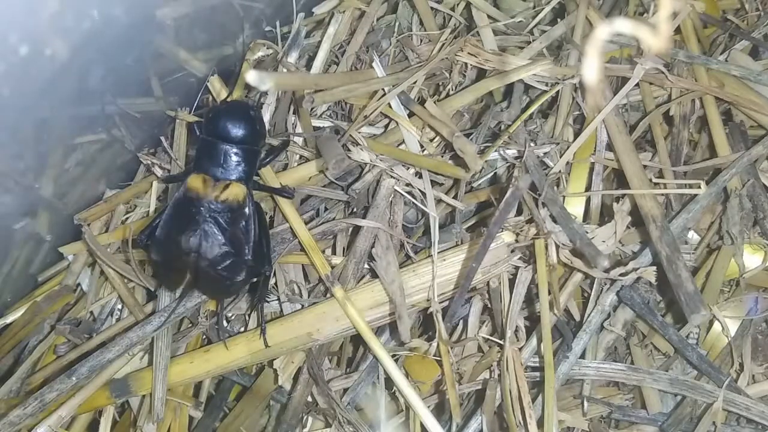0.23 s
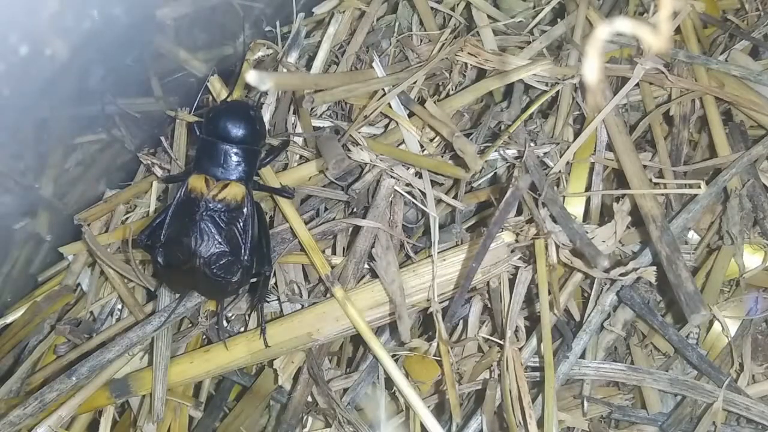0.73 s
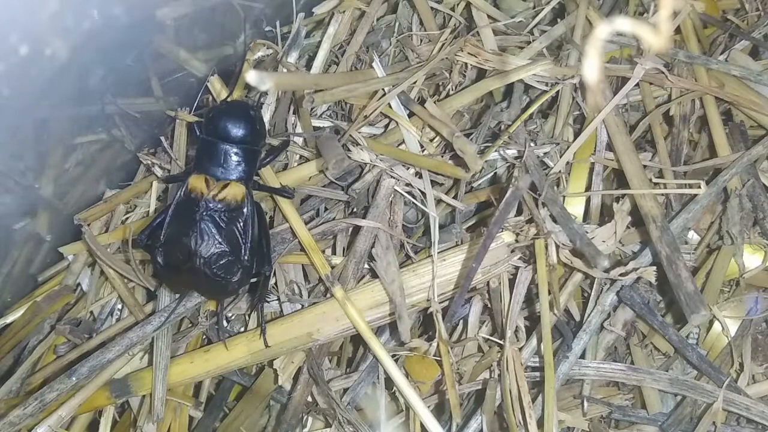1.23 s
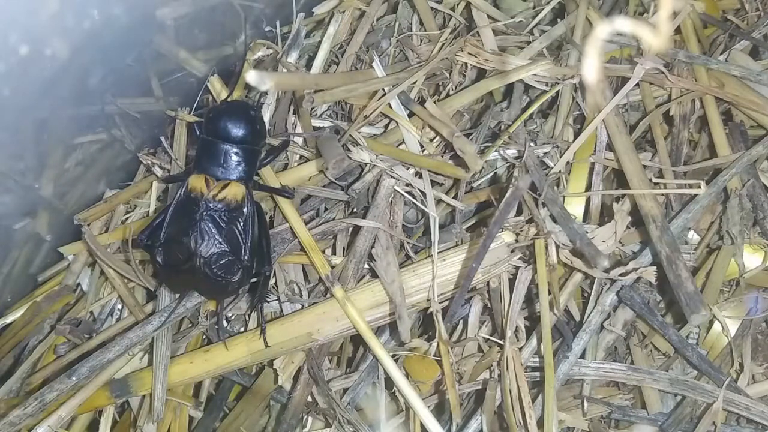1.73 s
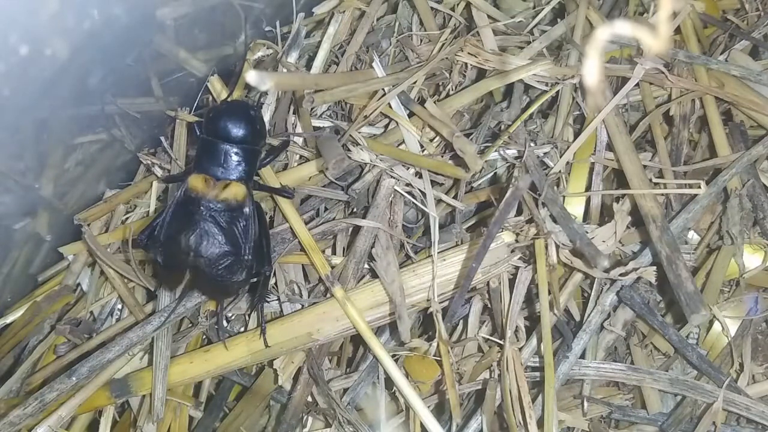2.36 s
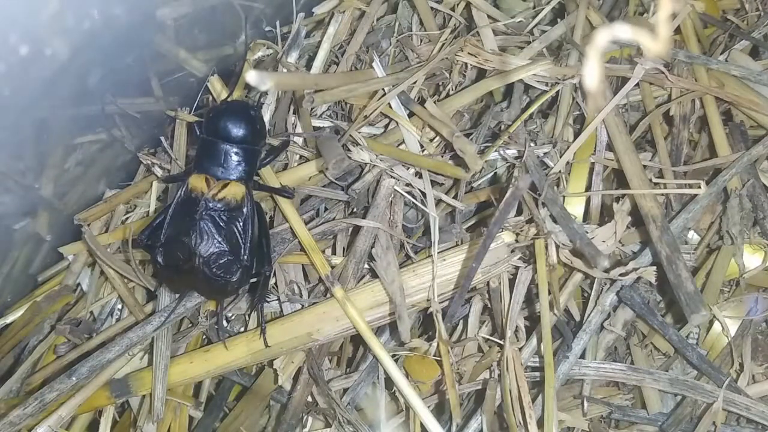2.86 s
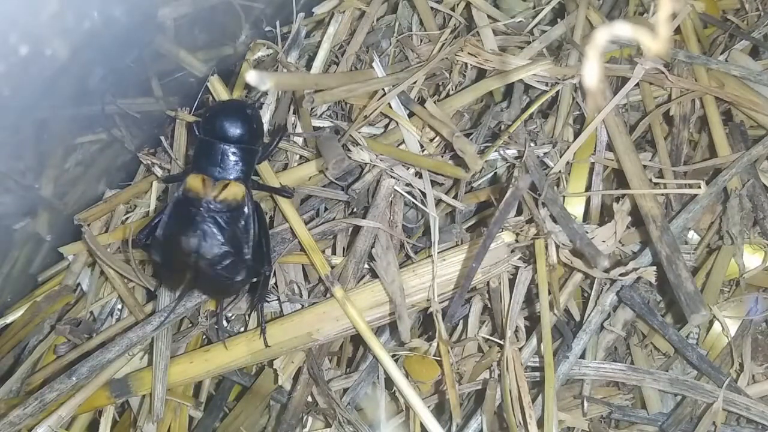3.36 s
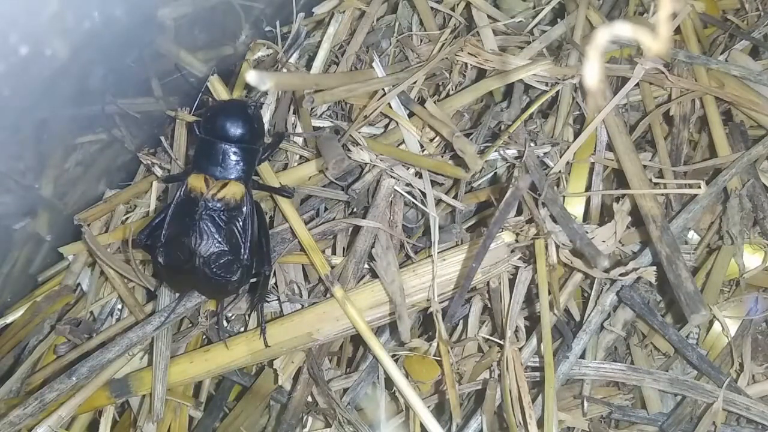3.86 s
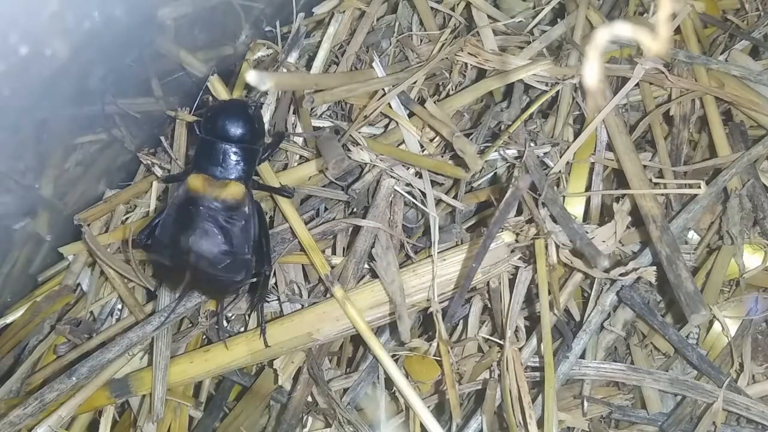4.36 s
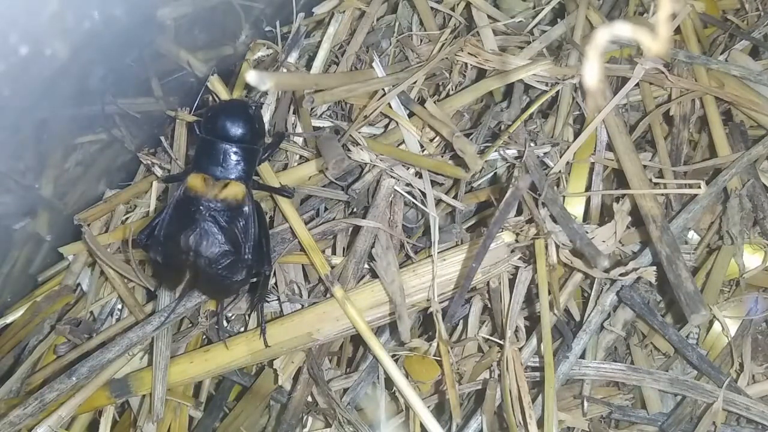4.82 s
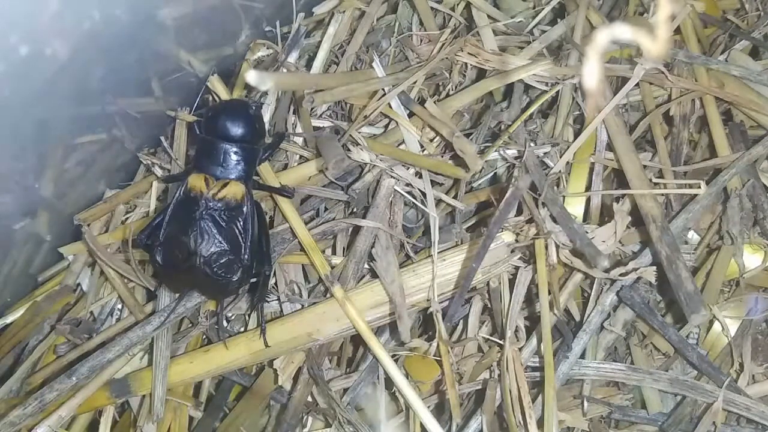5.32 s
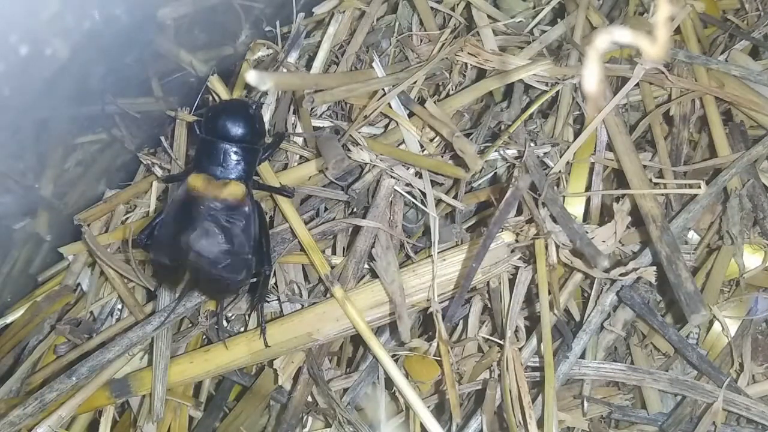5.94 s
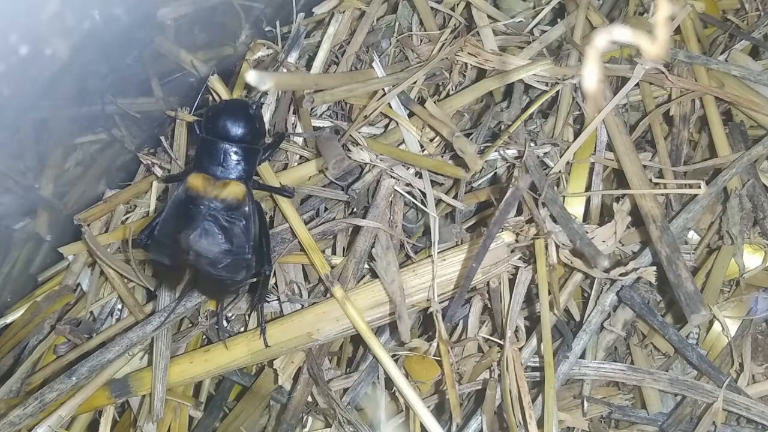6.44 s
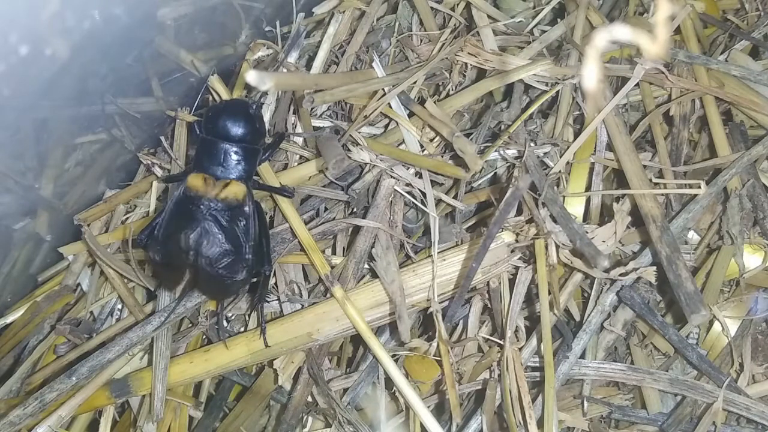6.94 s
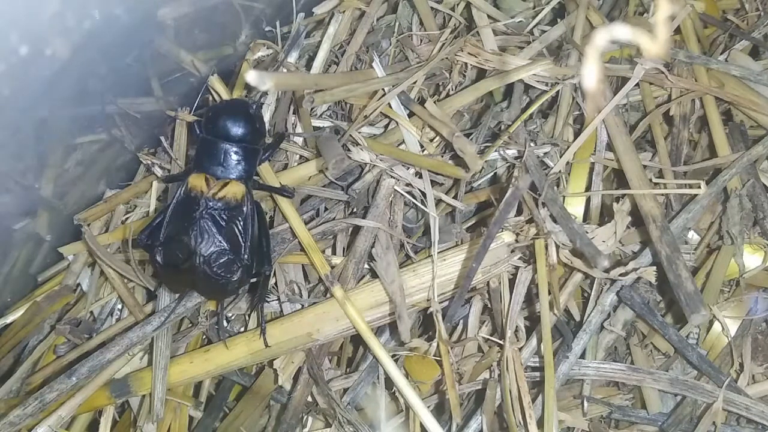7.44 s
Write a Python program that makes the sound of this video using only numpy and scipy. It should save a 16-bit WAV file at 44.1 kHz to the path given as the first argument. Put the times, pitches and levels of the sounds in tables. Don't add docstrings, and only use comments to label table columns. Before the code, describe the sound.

Shrill stridulation from one cricket, about four chirps a second, starting at once and continuing to the end. Faint scrapes precede bright pulses that swell, then sag slightly in pitch. After a weaker, less regular patch near the middle, the song becomes strong and even. A close overloaded microphone adds gritty edge on the right, with short tub reflections on the left and quiet gated pauses.

```python
import sys
import numpy as np
from scipy import signal
from scipy.fft import rfft, irfft, next_fast_len
from scipy.io import wavfile
from scipy.ndimage import uniform_filter1d

SR = 44100
rng = np.random.default_rng(int(sys.argv[2]) if len(sys.argv) > 2 else 0)


def ratio_of_db(decibels):
    return 10 ** (np.asarray(decibels, float) / 20)


def file_out(sig):
    cols = np.atleast_2d(sig).T
    lim = np.clip(cols, -1, 1)
    pcm = np.round(lim * 32767).astype(np.int16)
    wavfile.write(sys.argv[1], SR, pcm)


N = 338688
t = np.arange(N) / SR
SHORT_MS = 13.5


def shaped(x, gain):
    size = next_fast_len(N + SR // 4)
    hz = np.maximum(np.arange(size // 2 + 1) * SR / size, 1)
    return irfft(rfft(x, size) * gain(hz), size)[..., :N]


def spectrum(points):
    hz, db = np.transpose(points)
    return lambda f: ratio_of_db(np.interp(np.log(f), np.log(hz), db))


def resonances(modes):
    return lambda f: sum(ratio_of_db(db) / (1 + 1j * (f / hz - hz / f) * hz / w) for hz, w, db in modes)


def lag(x, s):
    a = np.exp(-1 / (max(s, 1e-5) * SR))
    return signal.lfilter([1 - a], [1, -a], x)


def wobble(rate):
    x = shaped(rng.standard_normal(N), lambda f: np.exp(-(f / rate) ** 2))
    return x / x.std()


def bursts(table, attack):
    env, place = np.zeros(N), np.zeros(N)
    for s, ms, db in table:
        i = slice(int(s * SR), min(int((s + ms / 1e3) * SR), N))
        place[i] = np.clip((t[i] - s) * 1e3 / ms, 0, 1)
        env[i] += ratio_of_db(db) * np.sin(np.pi * place[i] ** attack) ** 2
    return env, place


# frequency in Hz, level in dB per Hz.
AIR_SPECTRUM = [(18, -30.5), (35, -12), (112, 1), (400, -1), (600, -1.5), (1800, -9), (2600, -26),
                (4400, -60)]


def air():
    x = shaped(rng.standard_normal((2, N)), spectrum(AIR_SPECTRUM))
    return x / x.std() * ratio_of_db(np.array([[-76], [-72]]))


# start in seconds, length in ms, level in dB.
STRAY_STROKES = [
    (2.2286, 3.6, -27.5),
    (2.726, 8, -35),
    (2.7576, 6.6, -23),
    (3.238, 6, -17),
    (3.4361, 7.7, -51),
    (3.4533, 16, -31),
]
# lead in ms, length in ms, level in dB.
FULL_WARMUPS = [
    (41.28, 3.6, -31.5),
    (22.1, 8.5, -25.5),
]
# lead in ms, length in ms, level in dB.
SHORT_WARMUP_STROKE = (18.6, 7.5, -33.5)


def warmups():
    strokes_ahead = []
    for s, first_ms, *_ in FIRST_STROKES:
        leads = FULL_WARMUPS if first_ms > SHORT_MS else [SHORT_WARMUP_STROKE]
        for lead, ms, db in leads:
            strokes_ahead.append((s - lead / 1e3, ms, db + 1.5 * rng.standard_normal()))
    return STRAY_STROKES + strokes_ahead


def catches():
    lead_ms, length_ms = 3.43, 5.2
    loud = FIRST_STROKES + MIDDLE_STROKES + LAST_STROKES
    return [(s - lead_ms / 1e3, length_ms, catch_db) for s, _, _, catch_db in loud]


# frequency in Hz, width in Hz, level in dB.
WING_MODES = [
    (4400, 550, -22.5),
    (5220, 713, 4),
    (7000, 130, -5),
    (8800, 4500, -15),
    (13800, 6500, -17.5),
]


def scrapes(size):
    teeth = rng.standard_normal(N) * (rng.random(N) < .15)
    catch, _ = bursts(catches(), .9)
    tick, place = bursts(warmups(), 1.0)
    flutter_db = 4 * wobble(120)
    rub = lag(np.tanh(3 * size), 0.00033) * ratio_of_db(-11.5 + flutter_db)
    drive = catch * ratio_of_db(23.0) + tick * ratio_of_db(9.0) + rub
    ragged = shaped(teeth * drive, resonances(WING_MODES))
    ragged = shaped(ragged, lambda f: (.02 + 1 / (1 + (3800 / f) ** 14)) / (1 + (f / 9000) ** 3))
    glide_hz = 4800 - 800 * place + 70 * wobble(350)
    glide = np.sin(2 * np.pi * np.cumsum(glide_hz) / SR)
    return ragged + ratio_of_db(0.5) * tick * glide


# start in seconds, length in ms, near port level in dB over
# full scale, scraper catch level in dB.
FIRST_STROKES = [(0.0404, 11.1, -12.5, -25), (0.361, 4.6, -12, -38), (0.6176, 8.9, -9.5, -41),
                 (0.9558, 23.8, 0.5, -56), (1.1458, 12.9, -7.5, -30), (1.4689, 18.4, 0.5, -27.5),
                 (1.6913, 11.5, -13, -43), (1.9905, 19.8, 0.81, -57), (2.218, 6.4, -8, -55),
                 (2.521, 22.6, 0.95, -85.5), (2.7726, 15, 2.29, -26.5), (3.1559, 19.9, -6.5, -36.5),
                 (3.4721, 8.9, -9.5, -46), (3.794, 18.1, -5, -26.5), (4.2591, 16.5, -8.5, -23),
                 (4.4774, 21.3, -5, -27), (4.7577, 20.5, 0.81, -45), (4.9882, 23, 2.5, -29.5),
                 (5.2574, 21.3, 1.22, -29.5), (5.5041, 21.7, 1.6, -29.5), (5.7578, 24, 2.5, -35),
                 (6.0273, 24.5, 2.5, -43.5), (6.3048, 22.5, 2.5, -43.5), (6.5456, 21.5, 2.5, -25),
                 (6.8167, 24, 2.5, -39.5), (7.086, 23.6, 2.5, -45), (7.3497, 18, 3, -19),
                 (7.628, 20.4, 2.5, -34)]
# start in seconds, length in ms, near port level in dB
# over full scale, scraper catch level in dB.
MIDDLE_STROKES = [
    (0.0685, 21.5, 0.48, -31.5),
    (0.3811, 21, 0.5, -52),
    (0.643, 20.7, 0.5, -32),
    (1.1758, 16.7, 0.5, -26.5),
    (1.7177, 23.5, 0.5, -38),
    (2.242, 17.2, 0.5, -26),
    (2.8048, 18, 2.5, -22.5),
    (3.494, 20.4, -1, -28),
    (3.8255, 20.7, 0.92, -24.5),
]
# start in seconds, length in ms, near port level in dB over full scale,
# scraper catch level in dB.
LAST_STROKES = [(0.107, 18, 0.25, -34), (0.4161, 18.5, -4, -33.5), (0.6797, 20.4, 2.5, -39),
                (0.9917, 21, 2.5, -33), (1.215, 24.8, 2.5, -60.5), (1.5013, 24.6, 2.5, -32),
                (1.7541, 24, 2.5, -29), (2.0263, 18.7, 2.5, -21), (2.2793, 22.2, 3.5, -30.5),
                (2.5596, 17.2, 3, -23), (2.8359, 22.5, 4, -22.5), (3.188, 13.6, 0.4, -27),
                (3.5295, 14.3, -0.5, -22.5), (3.8586, 19.5, 2.5, -28), (4.289, 22.1, 2.5, -31.5),
                (4.5134, 20.4, 2.5, -30), (4.7913, 19.6, 2.5, -22.5), (5.028, 20, 4, -22.5),
                (5.2951, 18, 3.5, -23.5), (5.5397, 23, 3.5, -21.5), (5.7946, 24.2, 4, -25.5),
                (6.0636, 21, 3.5, -22), (6.3392, 21.8, 3.5, -30), (6.5785, 22.5, 3.5, -29.5),
                (6.8525, 21.5, 3.5, -51.5), (7.1197, 25.9, 4, -27), (7.379, 27, 4, -43.5),
                (7.6631, 22, 4.5, -25.5)]


def loud_strokes():
    # table, far port dB at full scale, far dB per dB of effort, place of the crest 0-1
    roles = [(FIRST_STROKES, -11, 0.41, 0.44), (MIDDLE_STROKES, -7.5, 0.48, 0.35), (LAST_STROKES, -7.5, 0.48, 0.49)]
    played = []
    for table, far_db, slope, usual_crest in roles:
        for s, ms, db, _ in table:
            top_hz = 4634.4 + 9.5 * db - 8 * max(12 - ms, 0)
            crest = 0.77 if ms < SHORT_MS else usual_crest
            played.append((s, ms, far_db + slope * db, db, top_hz, crest))
    return sorted(played)


# near port level in dB, far port level in dB.
HARP_OVERTONES = [
    (-37.5, -29.5),
    (-48.5, -50.5),
]


def strokes():
    end_hz, full_stroke_ms, glide_start, glide_power = 4152, 14, 0.28, 1.9
    stroke_end, far_crest, far_end = 1.14, .54, .97
    near, far, hz = np.zeros(N), np.zeros(N), np.full(N, 4500.)
    for s, ms, far_db, near_db, top_hz, crest in loud_strokes():
        i = slice(int(s * SR), min(int((s + 1.25 * ms / 1e3) * SR), N))
        u = (t[i] - s) * 1e3 / ms
        rise = np.sin(np.pi / 2 * np.clip(u / crest, 0, 1))
        fall = np.cos(np.pi / 2 * np.clip((u - crest) / (stroke_end - crest), 0, 1)) ** 3
        near[i] += ratio_of_db(near_db) * rise * fall
        swell = np.interp(u, [0, far_crest, far_end], [0, 1, 0])
        far[i] += ratio_of_db(far_db) * np.sin(np.pi / 2 * swell) ** 1.3
        sag = np.clip((u - glide_start) / (1.01 - glide_start), 0, 1.25) ** glide_power
        hz[i] = top_hz - (top_hz - end_hz) * min(ms / full_stroke_ms, 1) * sag
    phase = 2 * np.pi * np.cumsum(hz + 9 * wobble(300)) / SR
    near = lag(lag(near, .0002), .0002)
    far = lag(far, .0007) * ratio_of_db(.3 * wobble(400))
    slip = .35 * wobble(500)
    near_over, far_over = np.zeros(N), np.zeros(N)
    for k, (near_db, far_db) in enumerate(HARP_OVERTONES, start=2):
        overtone = np.sin(k * phase + slip) * ratio_of_db(2.5 * wobble(270))
        near_over += ratio_of_db(near_db) * overtone
        far_over += ratio_of_db(far_db) * overtone
    tone = np.sin(phase)
    soft = np.tanh(1.43 * near)
    return near * tone + soft * near_over, far * (tone + far_over), overload(near, phase), near


FOLDED_LINES = [(3, 1), (7, 2), (5, 1), (1, 1), (3, 0), (9, 2), (11, 3), (9, 3), (7, 3)]
FOLDED_LEVELS = [-14.5, -24, -26.5, -34, -39, -43, -40.5, -38.5, -45]


def overload(size, phase):
    excess = lag(np.clip(size - 1, 0, None) ** 1.2, .0006)
    clock = 2 * np.pi * 16000 * t
    lines = np.zeros(N)
    for (k, m), db in zip(FOLDED_LINES, FOLDED_LEVELS):
        lines += ratio_of_db(db + 2.3 * wobble(400)) * np.sin(k * phase - m * clock)
    hiss = ratio_of_db(-30.0) * wobble(3500)
    return shaped(excess * (lines + hiss), lambda f: 1 / (1 + (80 / f) ** 2))


def tub(x):
    t60_s = 0.15
    age = np.arange(int(.35 * SR)) / SR
    onset = np.clip(age / 0.0013 - .3, 0, 1)
    tail = rng.standard_normal((2, len(age))) * ratio_of_db(-60 * age / t60_s) * onset
    tail /= np.sqrt(np.sum(tail ** 2, axis=1, keepdims=True))
    return signal.fftconvolve(x[None], tail, axes=1)[:, :N]


def far_port(far, wall):
    lag_s, echo_s, echo_db = .000768, .025, -16
    late = shaped(far, lambda f: np.exp(-2j * np.pi * f * lag_s) + ratio_of_db(echo_db) * np.exp(-2j * np.pi * f * echo_s))
    bright = shaped(wall, lambda f: 1 + ratio_of_db(8.5) / (1 + (7500 / f) ** 8))
    return late + ratio_of_db(-18) * bright


def limiter(x):
    cycles = 19
    power = uniform_filter1d(uniform_filter1d(x ** 2, cycles), cycles).clip(0)
    env = np.sqrt(2 * power) / .68
    return x / (1 + env ** 3) ** (1 / 3)


# start in seconds, frequency in Hz, level in dB, 60 dB decay time in seconds.
STRAW_SNAPS = [
    (4.944, 1090, -51, 0.066),
    (5.496, 1850, -39.5, .007),
]


def grit(size):
    grains = rng.standard_normal((2, N)) * (rng.random((2, N)) < .1)
    shaking = lag(np.tanh(3 * size), 0.011)
    out = shaped(grains * shaking, resonances([(2950, 2500, -34.5)]))
    for s, hz, db, t60 in STRAW_SNAPS:
        age = np.clip(t - s, 0, None)
        out = out + ratio_of_db(db - 60 * age / t60) * np.sin(2 * np.pi * hz * age)
    return out


def scene():
    near, far, folded, size = strokes()
    rasp = scrapes(size)
    far = far + ratio_of_db(-21) * shaped(rasp, resonances([(5560, 7500, 0), (11000, 500, -2.2)]))
    walls = tub(far + ratio_of_db(-5.5) * rasp)
    song = limiter(ratio_of_db(6.5) * near + rasp + ratio_of_db(-9.5) * walls[1])
    return np.array([far_port(far, walls[0]), song + folded]) + air() + grit(size)


def gate(x):
    power = uniform_filter1d(np.sum(x ** 2, axis=0), size=600)
    level_db = 10 * np.log10(lag(power, 0.0062) + 1e-12)
    return x * ratio_of_db(np.clip(.8 * (level_db + 44), -34, 0))


def low_pass(x):
    return signal.sosfilt(signal.butter(12, 16660, fs=SR, output="sos"), x)


def record(dry):
    mix = shaped(gate(dry), lambda f: 1 / (1 + (f / 15300) ** 30))
    return low_pass(mix)


dry = scene()
out = record(dry)
file_out(out)
```